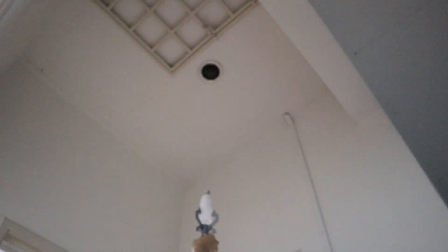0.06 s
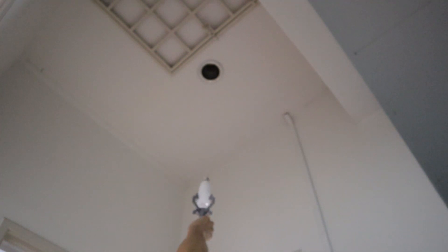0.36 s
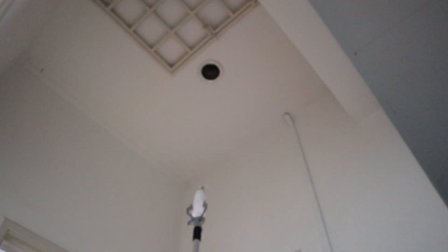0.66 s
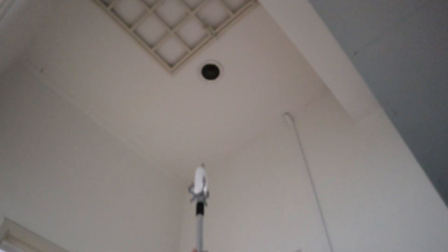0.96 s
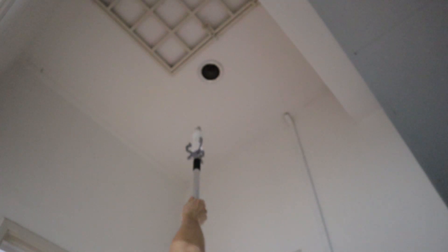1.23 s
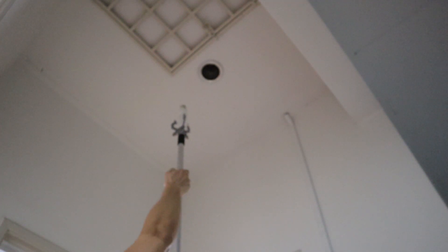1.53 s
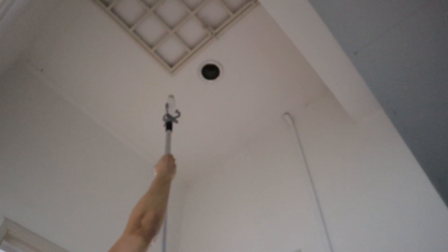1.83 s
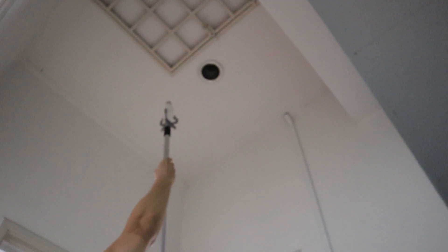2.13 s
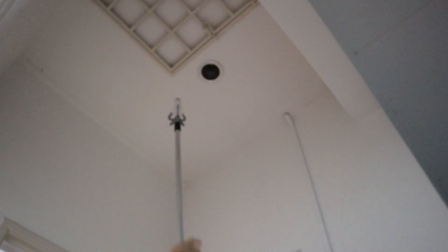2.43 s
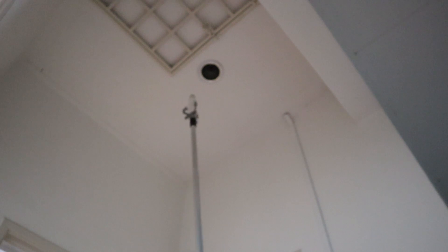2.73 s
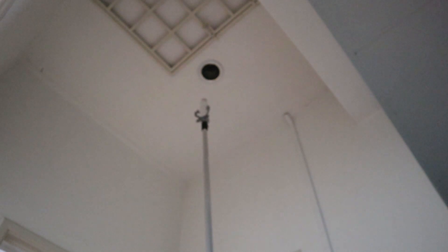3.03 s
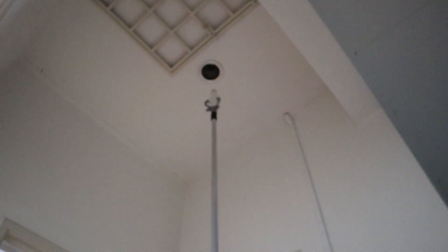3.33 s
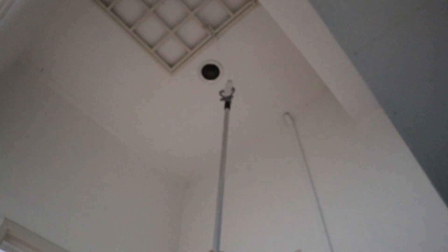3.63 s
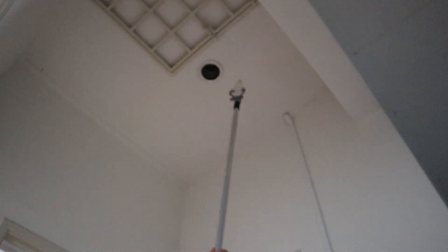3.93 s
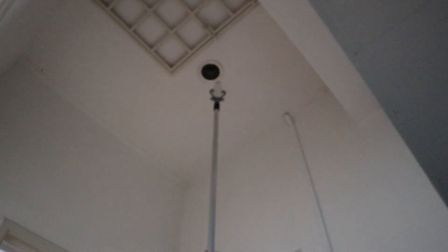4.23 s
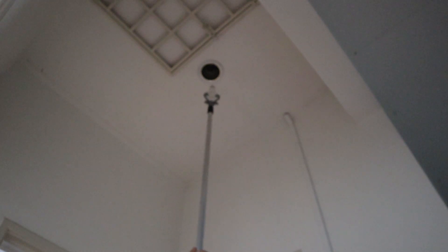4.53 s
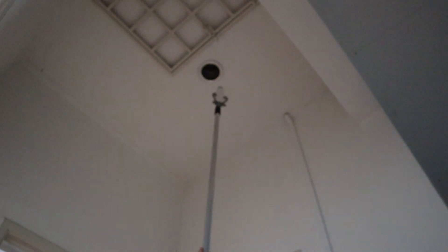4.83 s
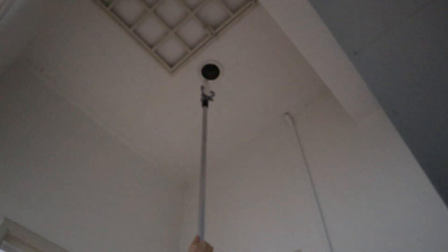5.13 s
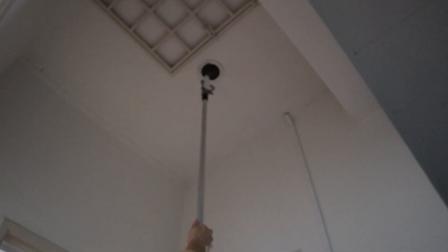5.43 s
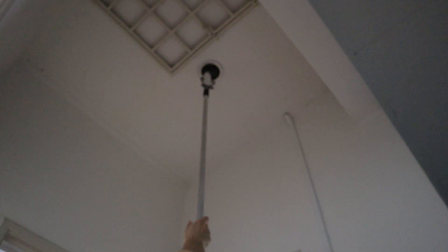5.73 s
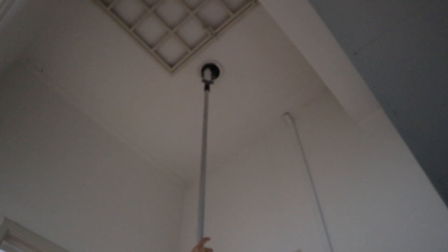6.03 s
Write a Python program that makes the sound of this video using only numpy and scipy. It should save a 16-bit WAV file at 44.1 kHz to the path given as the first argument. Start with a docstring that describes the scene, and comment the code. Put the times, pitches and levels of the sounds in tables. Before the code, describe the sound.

Irregular swishes of skin on a hollow tube mix with light plastic clicks and creaks as a long gripping pole is raised. One hard, ringing knock stands out early, followed by a run of softer knocks and ticks. The hands keep sliding, adding faint friction squeaks and a final firm stroke. The microphone picks up the nearby pole with a short echo from bare walls and a low, steady background hush.

```python
"""A plastic gripper on a hollow telescopic pole is pushed up, hand over hand, in a small bare room.
Over faint room noise a palm rubs along the tube, then the plastic jaws click and the collar creaks.
At 1.5 s the sections knock hardest as they are drawn out, and the pole and the hard walls ring.
A run of knocks follows around 2.6 s, then a flurry of clicks and more strokes of the palms.
From 5.2 s thin friction squeals ride on the rub, and the strongest stroke ends the scene."""
import sys
import numpy as np
from scipy import signal
from scipy.fft import rfft, irfft, next_fast_len
from scipy.io import wavfile

SR = 44100
rng = np.random.default_rng(int(sys.argv[2]) if len(sys.argv) > 2 else 0)


def wav_out(sig):
    """Save sig, one row per channel (or a flat mono array), as 16-bit PCM at SR to the path in sys.argv[1]."""
    wavfile.write(sys.argv[1], SR, np.round(np.clip(np.atleast_2d(sig).T, -1, 1) * 32767).astype(np.int16))


N = 272079
TIME = np.arange(N) / SR
TAIL = TIME[:SR * 4 // 5]   # the 0.8 s a contact has to ring out

# Colour of the room tone. Each row: frequency in Hz, relative level in dB.
ROOM_TONE = [(15, -20), (25, -6), (91, -2.5), (178, -1), (349, -1), (410, -1), (457, -17), (509, -4.5),
             (762, -4.5), (2700, -20), (3000, -11.5), (5730, -23.5), (6210, -14.5), (7100, -27),
             (15500, -25.5)]
# Reverb of the bare room. Each row: frequency in Hz, time to fall 60 dB in seconds.
ROOM_DECAY = [(150, 1), (400, 0.88), (1000, 0.67), (2800, 0.62), (7000, 0.62), (14000, 0.27)]
# Modes of the pole. Each row: pitch in Hz, relative level in dB, undamped time to fall 60 dB in seconds.
POLE_MODES = [(214.5, -12.5, 0.53), (398, -6, 0.89), (440, -1, 0.21), (704, -3.5, 0.95), (730, -12.5, 1),
              (1028, -4, 0.32), (1196, -22, 0.25), (1462, -2.5, 0.2), (2370, -12.5, 0.61)]
# Squeals of the sliding tube, and the plastic's ring near 3.2 kHz lingering after its clicks and creaks.
# Each row: start and end in seconds, pitch and width in Hz, level in dB.
SQUEALS_AND_RINGS = [(1.075, 1.115, 8400, 1200, -38), (1.17, 1.26, 3330, 800, -44),
                     (1.38, 1.48, 3230, 800, -45), (3.88, 4.06, 6620, 300, -54),
                     (4.29, 4.5, 7620, 220, -43.5), (4.3, 4.45, 13600, 250, -49),
                     (5.24, 5.66, 6379, 110, -50), (5.25, 5.62, 9480, 170, -52),
                     (5.28, 5.66, 10290, 120, -52), (5.3, 5.62, 11100, 170, -54),
                     (5.25, 5.6, 12000, 250, -53), (5.25, 5.6, 14600, 250, -54),
                     (5.8, 5.86, 7850, 240, -41), (5.85, 6.1, 13400, 300, -46)]
# Creaks of the collar. Each row: start in seconds, drive in dB, chatter in ms, strongest ring in Hz.
COLLAR_CREAKS = [(0.78, -43, 4.3, 3280), (0.993, -42.5, 7, 2540), (1.034, -46.3, 4.4, 3100),
                 (1.073, -40.5, 8, 3060), (1.139, -33, 11, 3100), (1.444, -40, 9, 3200),
                 (2.2384, -42.5, 1.4, 2850), (3.245, -40, 12, 2580)]
# Clicks of the jaws. Each row: start in seconds, drive in dB, contact time in ms, chatter in ms,
# strongest ring in Hz.
JAW_CLICKS = [(.079, -45.5, .04, 4.9, 7350), (.5895, -34, 0.24, 4, 2860), (.8525, -39.5, 0.033, 1.5, 1300),
              (.968, -41, 0.037, 0.69, 5200), (1.083, -38.5, .04, 6.6, 8300),
              (1.1503, -41.5, 0.054, 1.1, 5500), (1.283, -41.5, .06, 13, 3300),
              (1.3725, -36, 0.14, 1.8, 1050), (2.121, -36, 0.39, 9.5, 2380), (2.2145, -40.5, 0.34, 2, 3470),
              (2.335, -37.5, 0.17, 9.7, 980), (2.39, -45, 0.055, 4.7, 4270), (3.07, -37, 0.45, 4.9, 1030),
              (3.1, -40, 0.075, 5.5, 1070), (3.182, -41.5, 0.21, 5.3, 3120),
              (3.201, -37.5, 0.13, 13.4, 1056), (3.2416, -42, .1, 8.5, 5700),
              (3.298, -37.5, 0.13, 2.8, 8700), (3.319, -36, 0.087, 5, 1120),
              (3.441, -48.5, 0.11, 2.6, 5370), (3.486, -45.5, .11, 8.1, 1000),
              (3.947, -44.5, 0.14, 7.3, 5970), (4.104, -40.5, 0.11, 3.4, 6800),
              (4.259, -41.5, 0.13, 3.9, 930), (4.881, -34.5, 0.069, 8.1, 1015)]
# Knocks of the sections and bumps of the hand. Each row: start in seconds, drive in dB,
# contact time in ms, chatter in ms, strongest ring in Hz.
TUBE_KNOCKS = [(0.591, -36.5, 0.74, 11, 328), (1.54, -24, 0.37, 1.1, 1270), (1.582, -30, 0.92, 4.6, 760),
               (2.461, -34.5, 0.32, 5.8, 1056), (2.533, -35.5, 0.42, 11, 1030),
               (2.607, -39, 0.36, 3.5, 1090), (2.7078, -31.5, 0.18, 7.3, 1060),
               (2.728, -33.5, 0.2, 15, 1486), (2.778, -34, 0.28, 3.8, 1090), (4.285, -40, .55, 9.7, 447),
               (5.352, -38, .6, 16, 646)]
# Body, shell, edge and top bands of the plastic and of the tube. Each row: low and high edge in Hz.
PLASTIC_BANDS = [(390, 1690), (2150, 4460), (5000, 9400), (10000, 16000)]
TUBE_BANDS = [(290, 1530), (1850, 3560), (4500, 7600), (9500, 13000)]
# Colour of skin rubbing on the tube. Each row: frequency in Hz, relative level in dB.
RUB_COLOUR = [(100, -19), (220, -12), (420, -2.5), (600, 1), (770, -1), (960, 1.5), (1300, -0.5), (1750, 0),
              (2100, -3.5), (2400, 0), (3100, -13), (8800, -14.5), (11000, -18), (16000, -21.5)]
# Tube resonances that the rub wakes. Each row: pitch in Hz, width in Hz, boost in dB.
TUBE_RESONANCES = [(423, 14, 3), (787, 14, 1), (1050, 11, 6), (1270, 39, 4.5)]
# Strokes of a palm. Each row: start, rise and hold in seconds, rub level in dB, brightness in dB.
PALM_STROKES = [(0, 0.0013, .005, -42, 0.5), (.06, 0.034, 0.018, -50, 8), (.26, 0.025, 0.08, -47, -0.2),
                (0.363, 0.038, 0.051, -31, 1.1), (.48, 0.026, 0.068, -31, -0.8),
                (.74, 0.12, .22, -46.5, 1.5), (1.07, 0.061, 0.3, -47.5, 4.5), (1.41, .11, 0.08, -41, 4.5),
                (1.722, 0.1, 0.018, -39.5, -1), (1.8, 0.099, 0.066, -33.5, -1.1),
                (2.08, 0.054, .04, -42.5, -14), (2.38, .06, .44, -47.5, -7),
                (2.88, 0.038, 0.067, -40.5, -1), (3.1, 0.098, .12, -44.5, -6),
                (3.45, 0.049, .015, -46.5, -6), (3.58, 0.025, 0.039, -44, -3),
                (3.84, 0.045, 0.059, -45.5, -4), (4.04, 0.072, .13, -44.5, -1.5),
                (4.23, 0.036, 0.027, -36.5, -4.5), (4.28, 0.041, 0.056, -36, -0.5),
                (4.4, 0.073, 0.11, -41.5, -2), (4.61, 0.042, 0.082, -36, -2), (5.17, .11, .25, -39.5, 0),
                (5.3, 0.066, .07, -38, -1.2), (5.77, 0.062, 0.032, -37.5, 1.1),
                (5.822, 0.11, 0.06, -27, -1)]

PUSH_POWER, FADE_DB_PER_S = 1.25, 78.5   # attack curve and release of a stroke
HISS_POWER, AIR_POWER = 1.04, 1.32   # powers of speed; "air" is the finest hiss
AIR_DB, AIR_FOLLOWS = -5, 1.2   # air against the rub, and how far it follows a stroke's brightness
GRIP_RUB_DB, GRIP_HISS_DB, GRIP_AIR_DB = -57, -62.5, -68   # the holding hand never lies quite still
PRESSURE_WAVER_DB, PRESSURE_WAVER_PER_S = 0.9, 22


def from_db(db):
    """Decibels to gain."""
    return 10 ** (np.asarray(db) / 20)


def unit_energy(x):
    """Scale to a sum of squares of 1."""
    return x / np.sqrt(np.sum(x ** 2) + 1e-20)


def rms_one(x):
    """Scale to rms 1."""
    return unit_energy(x) * np.sqrt(len(x))


def at_hz(points, hz):
    """Read a table on a log-frequency axis."""
    table_hz, value = np.transpose(points)
    return np.interp(np.log(np.maximum(hz, 1)), np.log(table_hz), value)


def band(x, low_hz, high_hz, order=2):
    """Band-pass filter."""
    edges = [low_hz, min(high_hz, .45 * SR)]
    return signal.sosfilt(signal.butter(order, edges, "band", fs=SR, output="sos"), x + 1e-18)


def resonate(x, hz, width_hz, boost_db):
    """Lift one resonance out of a sound."""
    peak = signal.lfilter(*signal.iirpeak(hz, hz / width_hz, fs=SR), x)
    return x + (from_db(boost_db) - 1) * peak


def coloured(x, spectrum):
    """Shape a steady noise with an EQ curve."""
    size = next_fast_len(N)
    curve = from_db(at_hz(spectrum, np.fft.rfftfreq(size, 1 / SR)))
    return irfft(rfft(x, size) * curve, size)[:N]


def drift(per_s):
    """A random modulator of rms 1, gliding to per_s new values a second."""
    knots = rng.standard_normal(4096)
    return rms_one(np.interp(TIME * per_s, np.arange(len(knots)), knots))


def add(out, start_s, sound):
    """Lay a sound into the track."""
    start = round(start_s * SR)
    out[start:start + len(sound)] += sound[:N - start]


def room_tone(level_db):
    """A faint, steady bed of dark noise."""
    return from_db(level_db) * rms_one(coloured(rng.standard_normal(N), ROOM_TONE))


def diffuse_tail():
    """Dense wall reflections, dying sooner in the treble."""
    white = rng.standard_normal((2, len(TAIL)))
    edges = np.geomspace(70, 18000, 9)
    tail = np.zeros(len(TAIL))
    for k, (low, high) in enumerate(zip(edges, edges[1:])):
        t60 = at_hz(ROOM_DECAY, np.sqrt(low * high))
        tail += band(white[k % 2], low, high) * from_db(-60 * TAIL / t60)
    return unit_energy(tail * (1 - np.exp(-TAIL / 0.0021)))


def room_path(tail, early_db, early_s, late_db):
    """Direct sound, near-wall echoes drawn afresh for each position of the pole, then the tail."""
    direct = 1. * (TAIL == 0)
    echoes = rng.standard_normal(len(TAIL)) * (rng.random(len(TAIL)) < .12)
    early = unit_energy(echoes * (TAIL > .002) * np.exp(-(TAIL / early_s) ** 2))
    return direct + from_db(early_db) * early + from_db(late_db) * tail


def pole_thud(level_db, low_hz, high_hz, t60_s):
    """A hard knock booms briefly in the room; lighter ones hardly do."""
    out = np.zeros(N)
    hardest_db = max(knock[1] for knock in TUBE_KNOCKS)
    for start, drive_db, *_ in TUBE_KNOCKS:
        boom = rms_one(band(rng.standard_normal(len(TAIL)), low_hz, high_hz))
        add(out, start, boom * from_db(level_db + drive_db - hardest_db - 60 * TAIL / t60_s))
    return out


def pole_ring(gain_db, favoured_db, spread_db, build_s, damping_db_per_s):
    """Knocks ring the pole, favouring modes near their own pitch; the holding hand damps the ring."""
    out = np.zeros(N)
    hz, mode_db, t60 = np.transpose(POLE_MODES)[:, :, None]
    decay_db = (60 / t60 + damping_db_per_s) * TAIL
    attack = 1 - np.exp(-TAIL / build_s)   # the room builds the tones up
    for start, drive_db, *_, ring_hz in TUBE_KNOCKS:
        nearness = np.exp(-(np.log(hz / ring_hz) / .1) ** 2)
        scatter_db = spread_db * rng.standard_normal(hz.shape)
        strength_db = drive_db + gain_db + mode_db + favoured_db * nearness + scatter_db
        tones = np.sin(2 * np.pi * (hz * TAIL + rng.random(hz.shape)))
        modes = from_db(strength_db - decay_db) * tones
        add(out, start, modes.sum(axis=0) * attack)
    return out


def squeals_and_rings(pitch_wander):
    """Uneven, wavering tones: friction squeals of the tube and the lingering ring of the plastic."""
    out = np.zeros(N)
    for start, end, hz, width_hz, level_db in SQUEALS_AND_RINGS:
        progress = np.clip((TIME - start) / (end - start), 0, 1)
        swell = np.sqrt(np.abs(np.sin(np.pi * progress)))
        roughness = drift(width_hz) + 1j * drift(width_hz)   # smears the tone into a narrow band
        phase = 2 * np.pi * np.cumsum(hz * (1 + pitch_wander * drift(30))) / SR
        out += from_db(level_db) * swell * np.real(roughness * np.exp(1j * phase))
    return out


def chatter(length_ms):
    """A first touch and a short run of fading slips; a long, grazing contact starts more softly."""
    age = TAIL * 1000 / length_ms
    touch = np.exp(-length_ms / 12) * (TAIL == 0)
    slips = rng.standard_normal(len(TAIL)) * (rng.random(len(TAIL)) < 2200 / SR)
    return touch + .4 * slips * np.exp(-age ** 2) * (1 - np.exp(-10 * age))


def band_gains(bands, contact_ms, ring_hz, off_ring_db, top_db):
    """Longer contacts wake less treble; the bands away from the ring and the top band get a trim."""
    centres = np.sqrt(np.prod(bands, axis=1))
    softness = 1 / np.sqrt(1 + (centres * contact_ms / 1000) ** 4)
    distance = np.abs(np.log(centres / ring_hz))
    trim_db = off_ring_db * (distance > distance.min()) + top_db * (centres == centres.max())
    return softness * from_db(trim_db)


def contacts(rows, bands, off_ring_db, top_db, ring_q, ring_db, core_width_hz, core_db, **room):
    """Each contact chatters into the tool's broad bands and one strong ring, and the walls answer."""
    out = np.zeros(N)
    tails = [diffuse_tail() for _ in range(4)]
    attack = TAIL < .025   # each band is levelled on its first 25 ms
    for k, (start, drive_db, contact_ms, chatter_ms, ring_hz) in enumerate(rows):
        path = room_path(tails[k % len(tails)], **room)
        hit = signal.fftconvolve(chatter(chatter_ms), path)[:len(TAIL)]
        hit = resonate(hit, ring_hz, ring_hz / ring_q, ring_db)
        hit = resonate(hit, ring_hz, core_width_hz, core_db)   # the ring's core sings on a little
        gains = band_gains(bands, contact_ms, ring_hz, off_ring_db, top_db)
        for gain, (low, high) in zip(gains, bands):
            part = band(hit, low, high, order=3)
            add(out, start, from_db(drive_db) * gain * part / np.std(part[attack]))
    return out


def collar_creaks(contact_ms):
    """The plastic collar slips in short bursts, focused tightly on its ring near 3 kHz."""
    rows = [(start, db, contact_ms, chatter_ms, hz) for start, db, chatter_ms, hz in COLLAR_CREAKS]
    return contacts(rows, PLASTIC_BANDS, off_ring_db=-25, top_db=-1, ring_q=7.2, ring_db=9,
                    core_width_hz=60, core_db=6.5, early_db=-1.0, early_s=0.027, late_db=-4.0)


def jaw_clicks():
    """The plastic jaws touch briefly, giving light, bright clicks."""
    return contacts(JAW_CLICKS, PLASTIC_BANDS, off_ring_db=-4.0, top_db=-6.5, ring_q=5.5, ring_db=4.0,
                    core_width_hz=40, core_db=8, early_db=0.6, early_s=0.021, late_db=-3.3)


def tube_knocks():
    """Sections knock and the hand bumps the tube: longer, hollow contacts with plenty of room."""
    return contacts(TUBE_KNOCKS, TUBE_BANDS, off_ring_db=0.9, top_db=0.5, ring_q=12, ring_db=5.5,
                    core_width_hz=25, core_db=8.0, early_db=2.9, early_s=0.031, late_db=-0.1)


def tube_wall(slips, ring_s, places=16):
    """The wall has many close, short-lived treble modes; which ones ring changes as the hand travels."""
    out = np.zeros(N)
    moments, spacing_s = np.linspace(0, TIME[-1], places, retstep=True)
    for moment in moments:
        crossfade = np.sqrt(np.maximum(1 - np.abs(TIME - moment) / spacing_s, 0))
        active = crossfade > 0
        modes = unit_energy(rng.standard_normal(len(TAIL)) * np.exp(-TAIL / ring_s))
        add(out, TIME[active][0], signal.fftconvolve((slips * crossfade)[active], modes))
    return band(out, 4300, 9800)


def stroke_envelopes():
    """Gains of hollow rub, hiss and air: a stroke speeds up, holds and fades, brightest while fast."""
    power = from_db([GRIP_RUB_DB, GRIP_HISS_DB, GRIP_AIR_DB])[:, None] ** 2 * np.ones(N)
    for start, rise_s, hold_s, level_db, bright_db in PALM_STROKES:
        age = TIME - start
        push = np.clip(age / rise_s, 0, 1) ** PUSH_POWER
        speed = push * from_db(-FADE_DB_PER_S * np.maximum(age - rise_s - hold_s, 0))
        hollow = from_db(level_db) * speed
        hiss = from_db(level_db + bright_db) * speed ** HISS_POWER
        air = from_db(level_db + AIR_DB + AIR_FOLLOWS * bright_db) * speed ** AIR_POWER
        power += np.square([hollow, hiss, air])
    return np.sqrt(power) * from_db(PRESSURE_WAVER_DB * drift(PRESSURE_WAVER_PER_S))


def sliding_palms(slips_per_s, grain_db, smooth_db, judder_db, wall_ring_s, wall_db):
    """Skin catches and slips on the tube in countless tiny steps, which ring in its wall and bore."""
    sizes = from_db(grain_db * np.minimum(rng.exponential(1, N), 4)) * rng.choice([-1, 1], N)
    grain = rms_one(sizes * (rng.random(N) < slips_per_s / SR))
    smooth = from_db(smooth_db) * rng.standard_normal(N)
    slips = (grain + smooth) * from_db(judder_db * drift(90))
    rub = coloured(slips + from_db(wall_db) * tube_wall(slips, wall_ring_s), RUB_COLOUR)
    for hz, width_hz, boost_db in TUBE_RESONANCES:
        rub = resonate(rub, hz, width_hz, boost_db)
    hollow = band(rub, 113, 2660, order=4)
    hiss = band(rub, 2924, 9780, order=5)
    air = band(rub, 9740, 21500, order=5)
    return sum(rms_one(part) * gain for part, gain in zip((hollow, hiss, air), stroke_envelopes()))


def scene():
    """The tool over the room tone, the same in both channels."""
    mix = sliding_palms(slips_per_s=5000, grain_db=1.0, smooth_db=0.5, judder_db=0.52,
                        wall_ring_s=0.01, wall_db=-7.5)
    mix += squeals_and_rings(pitch_wander=0.0025)
    mix += tube_knocks()
    mix += jaw_clicks()
    mix += collar_creaks(contact_ms=0.072)
    mix += pole_ring(gain_db=-3.5, favoured_db=9.5, spread_db=2.5, build_s=0.0015, damping_db_per_s=32)
    mix += pole_thud(level_db=-47.5, low_hz=80, high_hz=240, t60_s=1.0)
    mix += room_tone(level_db=-50.5)
    return np.stack([mix, mix])


def record(dry):
    """The microphone loses the bass below 38 Hz; the top is cut steeply at 15.9 kHz."""
    thin = signal.sosfilt(signal.butter(3, 38, "high", fs=SR, output="sos"), dry)
    return signal.sosfilt(signal.ellip(12, .1, 90, 15900, fs=SR, output="sos"), thin)


dry = scene()
out = record(dry)
wav_out(out)
```